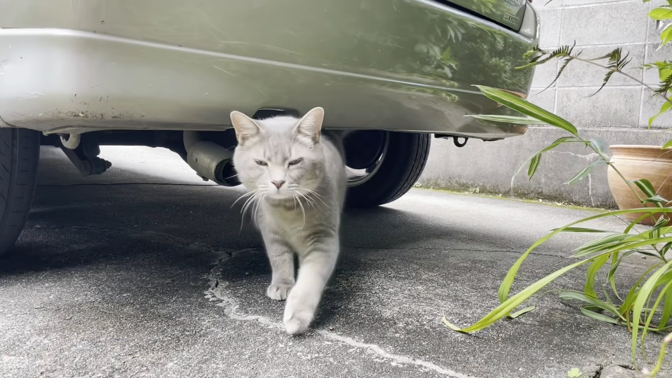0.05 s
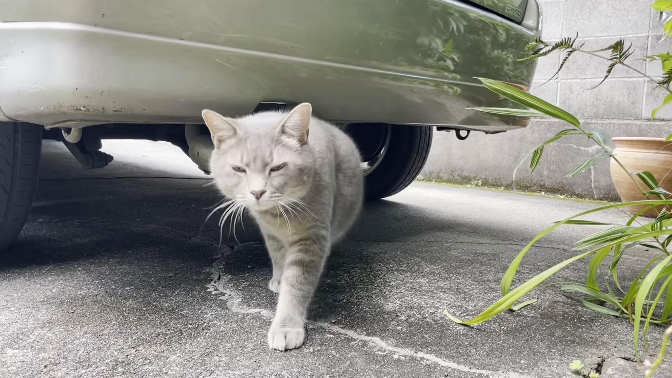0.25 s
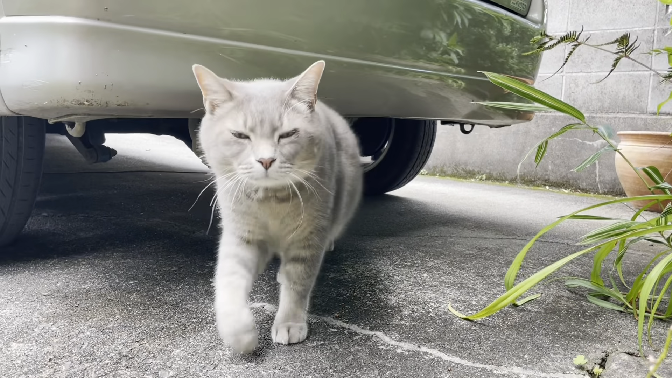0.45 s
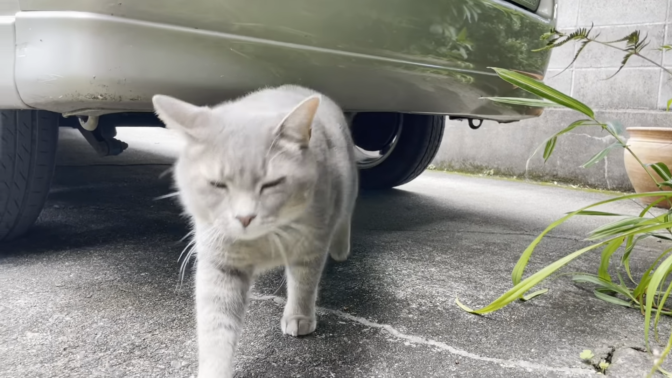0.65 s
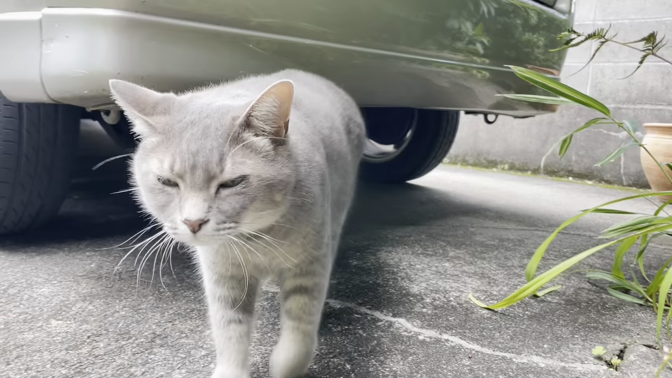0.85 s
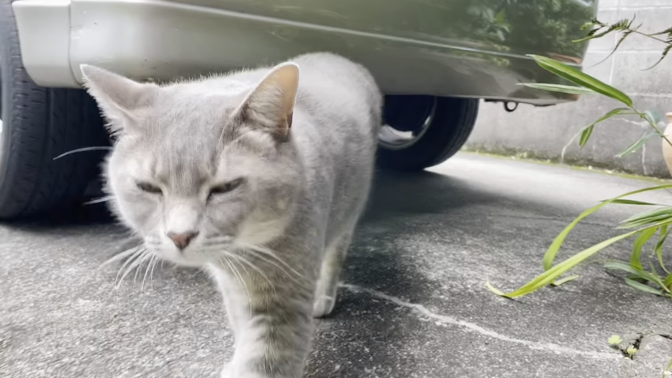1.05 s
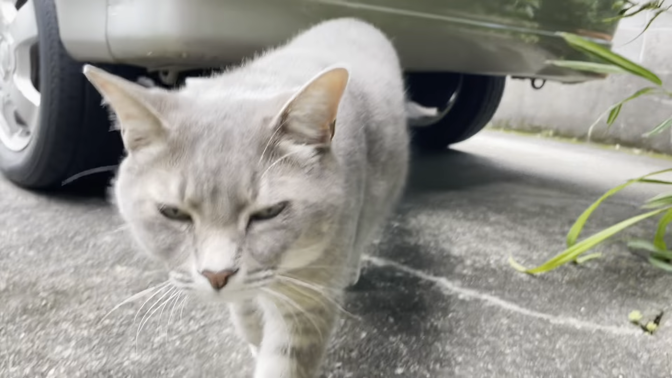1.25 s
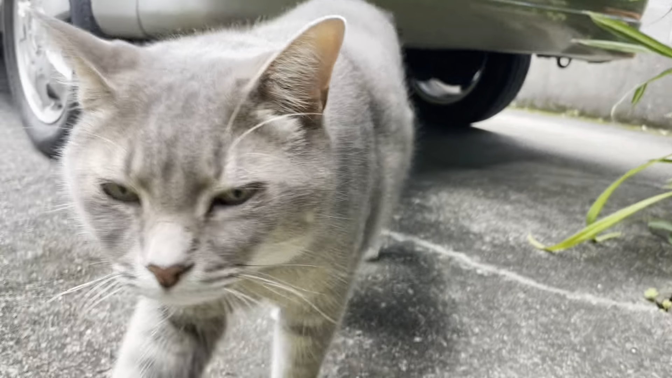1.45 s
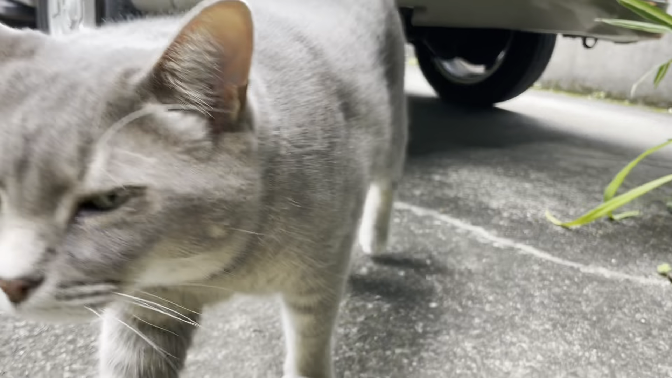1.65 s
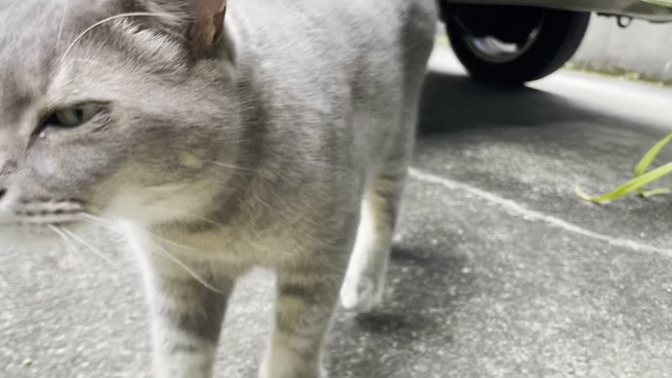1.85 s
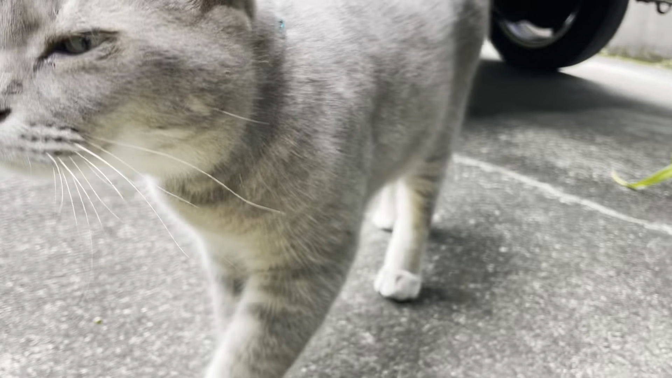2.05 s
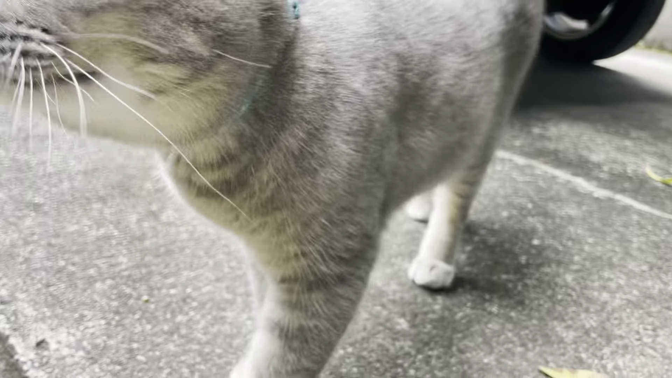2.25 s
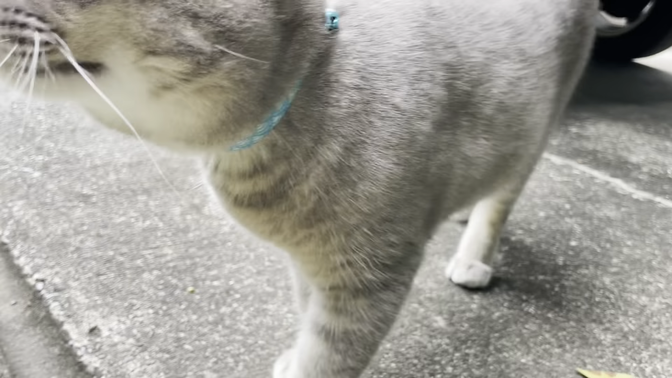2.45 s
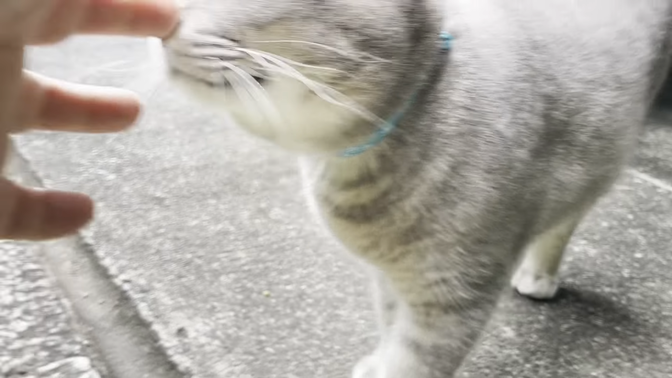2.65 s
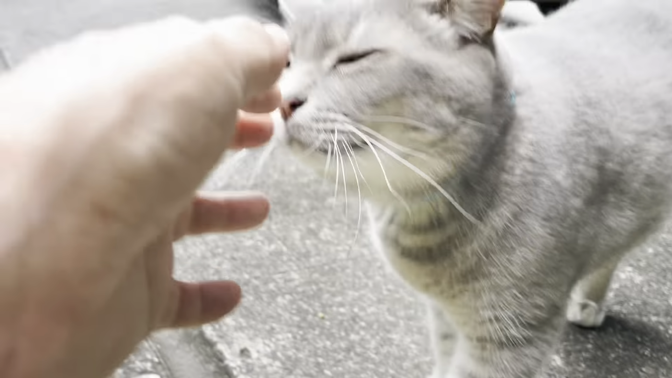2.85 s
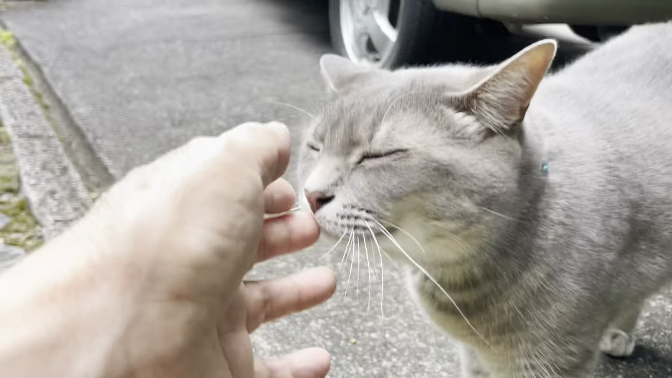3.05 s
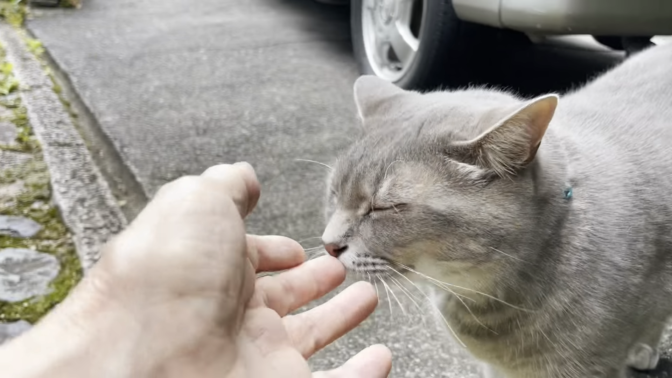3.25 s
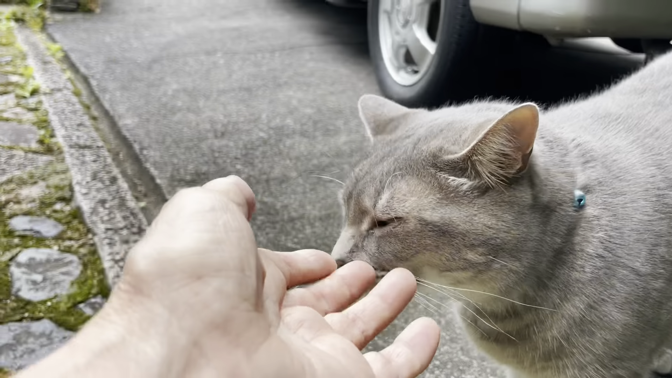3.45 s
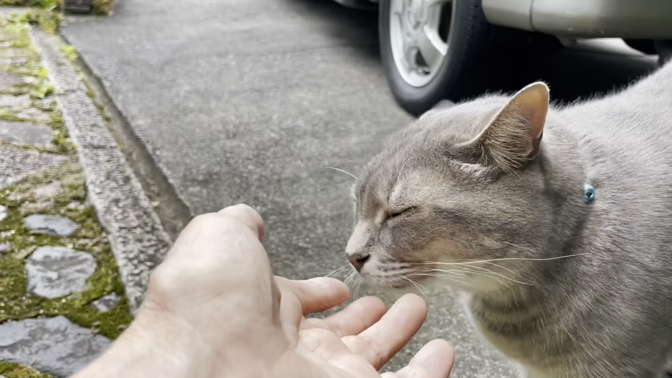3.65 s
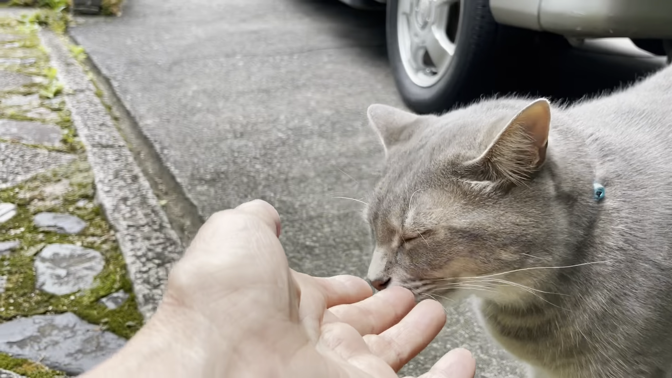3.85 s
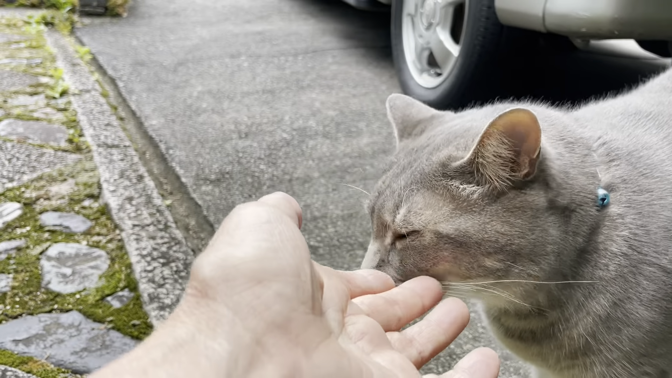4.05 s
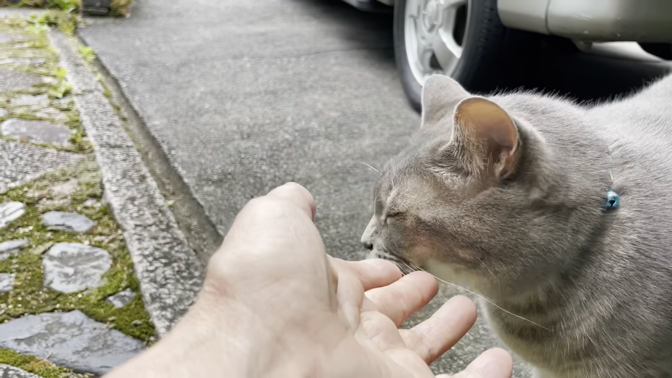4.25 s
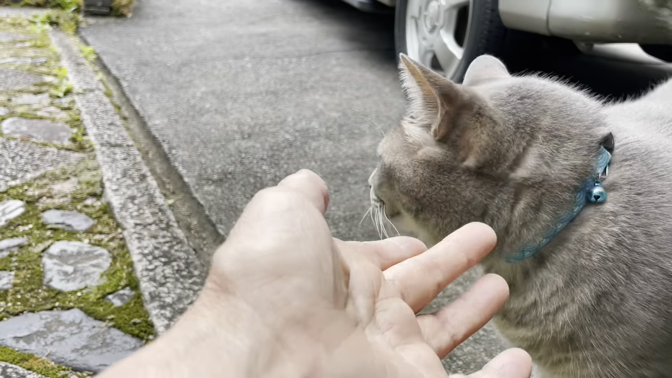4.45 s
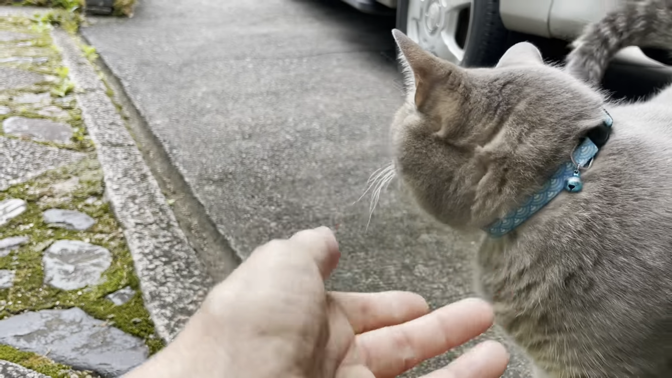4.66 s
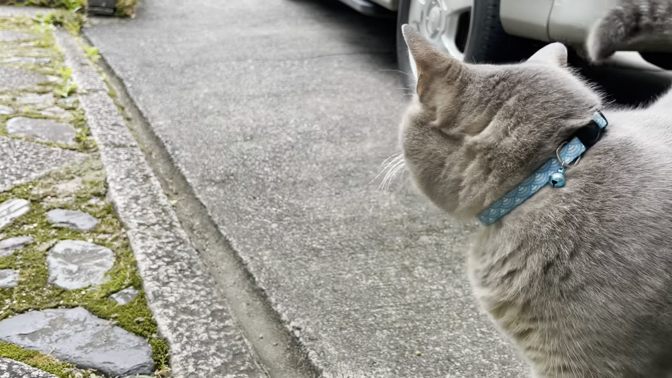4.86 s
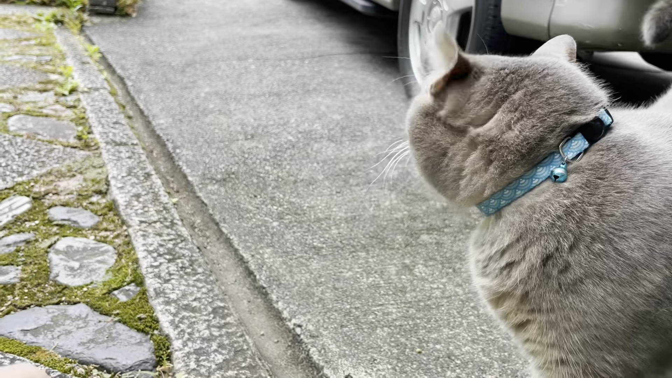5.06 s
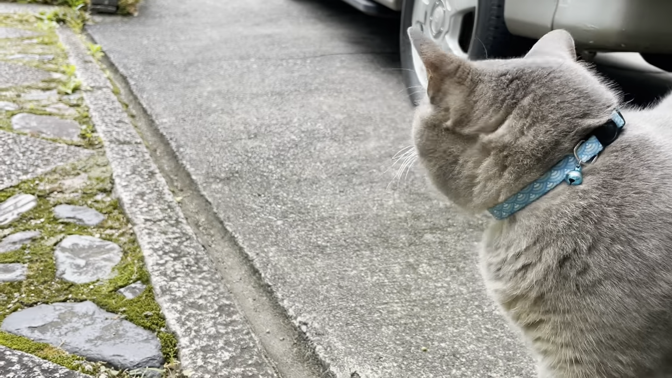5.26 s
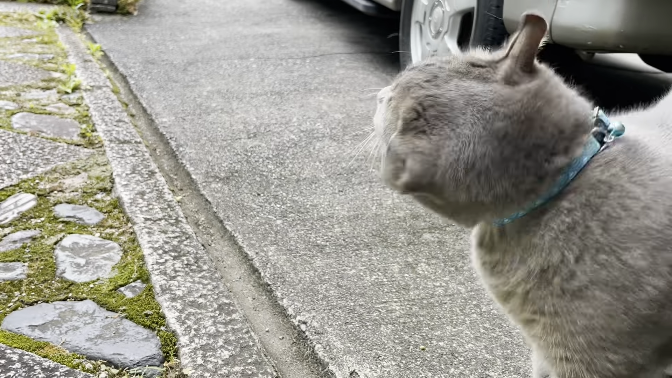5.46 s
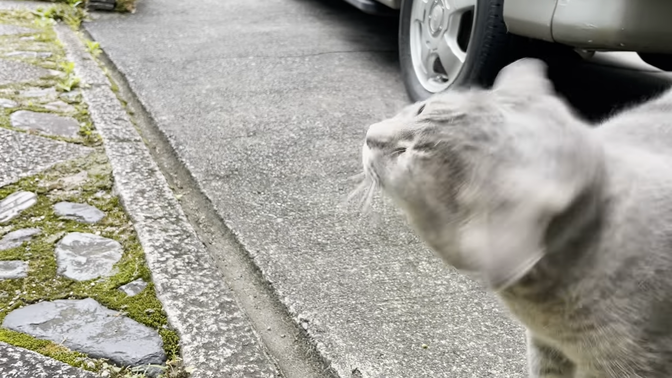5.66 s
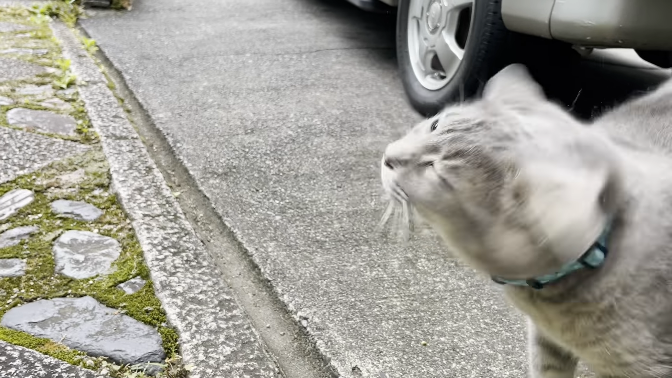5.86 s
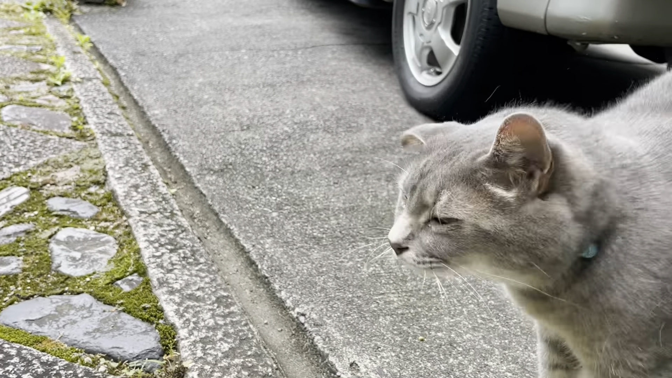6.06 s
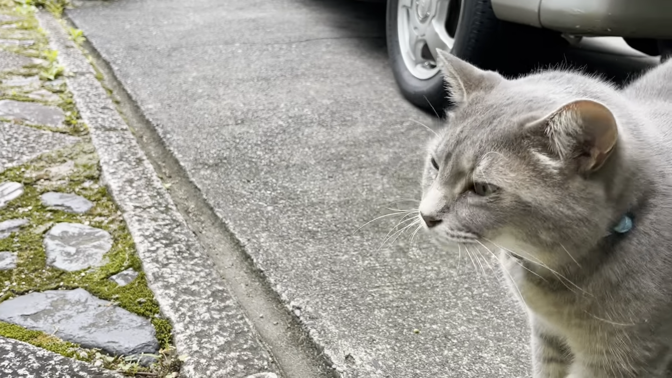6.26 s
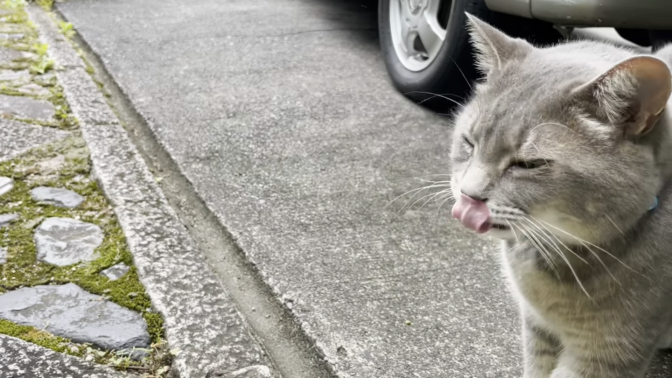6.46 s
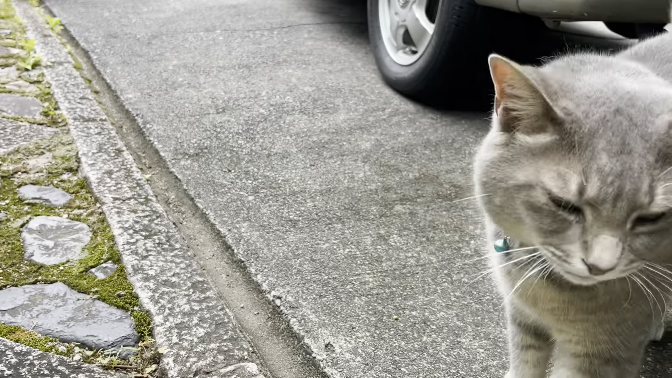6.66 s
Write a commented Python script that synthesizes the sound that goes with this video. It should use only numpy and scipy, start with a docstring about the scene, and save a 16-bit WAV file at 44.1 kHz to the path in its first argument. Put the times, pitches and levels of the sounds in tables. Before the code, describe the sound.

A cat pads quietly over concrete in a yard, its small collar bell barely ticking. Around it are a thin hiss of far cicadas, brief insect rasps and the low rumble of a town, and one closer cicada gradually starts to sing. After about five seconds comes the loudest sound, a close head shake: a quick, high rattle of the bell mixed with flapping ears and a soft puff of air. The insects carry on.

```python
"""A town rumbles and far cicadas hiss throughout. From the start an insect rasps now and then and a low,
distant cicada comes and goes; a pellet taps faintly in the tiny bell on a cat's collar and paws scuff
the concrete. From 2.35 s a near cicada winds up its song, muscle pulses buckling the ribs of its drums.
At 5.4 s the cat shakes its head: ears slap, the pellet rattles the bell, fur flutters and air puffs.
The yard scatters a short echo, and two microphone ports shift the treble's phase."""
import sys
import numpy as np
from scipy import signal
from scipy.fft import rfft, irfft, next_fast_len
from scipy.io import wavfile
from scipy.ndimage import uniform_filter1d

SR = 44100
rng = np.random.default_rng(int(sys.argv[2]) if len(sys.argv) > 2 else 0)


def wrap_up_sound(samples):
    """Save the sound to the file named by the first command line argument, as 16-bit audio."""
    columns = np.atleast_2d(samples).T
    # keep every value between -1 and 1, then stretch to whole-number steps
    tamed = np.clip(columns, -1, 1)
    steps = np.round(tamed * 32767).astype(np.int16)
    wavfile.write(sys.argv[1], SR, steps)


N = 296352


def gain_of(db):
    """Amplitude ratio of a level in decibels."""
    return 10 ** (np.asarray(db) / 20)


def unit_rms(x):
    """Normalisation to rms 1."""
    return x / np.sqrt(np.mean(x ** 2) + 1e-20)


def slow_noise(count, size, passes=1):
    """Low-pass noise of rms 1: white noise under moving averages of size samples."""
    x = rng.standard_normal(count)
    for _ in range(passes):
        x = uniform_filter1d(x, size=size)
    return unit_rms(x)


def pan(left_db):
    """Level difference: two gains, the left one left_db above the right."""
    return gain_of(left_db * np.array([[.5], [-.5]]))


def read(points, hz):
    """Interpolation of a spectrum table on a logarithmic frequency axis."""
    f, value = np.transpose(points)
    return np.interp(np.log(hz + 1), np.log(f + 1), value)


def add(mix, start_s, sound):
    """Superposition of a sound on the mix."""
    part = mix[round(start_s * SR):][:len(sound)]
    part += sound[:len(part)]


def coloured(x, points, tilt_db=0):
    """Minimum-phase filtering by a spectrum table, tilted by about tilt_db per octave."""
    hz = abs(np.fft.fftfreq(2048, 1 / SR))
    log_gain = np.log(gain_of(read(points, hz) + tilt_db * np.log2((hz + 200) / 2000)))
    response = np.fft.ifft(np.exp(np.conj(signal.hilbert(log_gain)))).real[:1024]
    return signal.oaconvolve(x, response)[:len(x)]


# Likeness of the background's two channels: f/Hz, coherence
COHERENCE = [(60, 0.99), (200, 0.91), (600, 0.25), (1500, 0.03), (3000, 0.69), (5000, 0.25), (7000, 1),
             (8200, 1), (12000, 0.99)]
# Balance of the background: f/Hz, left-minus-right level/dB
BALANCE = [(60, 0), (180, 2), (550, 1), (1650, 0.5), (4970, 2), (15000, -1.5)]
def wide_noise(field_db, size, patchy_db):
    """Partially coherent stereo noise of rms 1, shaped by field_db(hz, t) and by random patches."""
    hz = np.fft.rfftfreq(size, 1 / SR)
    t = np.arange(4 * N // size + 5) * size / 4 / SR
    a, b, c, d, patches = rng.standard_normal((len(t), len(hz), 5)).T
    patches = unit_rms(uniform_filter1d(uniform_filter1d(patches, size=8, axis=0), size=16, axis=1))
    coherence = read(COHERENCE, hz)[:, None]
    left = a + 1j * b
    right = coherence * left + np.sqrt(1 - coherence ** 2) * (c + 1j * d)
    spectra = np.array([left, right]) * pan(read(BALANCE, hz))[:, :, None]
    spectra *= gain_of(field_db(hz[:, None], t) + patchy_db * patches)
    return unit_rms(signal.istft(spectra, nperseg=size, noverlap=size * 3 // 4)[1][:, :N])


# Spectral density of the town: f/Hz, relative level/dB
TOWN_SPECTRUM = [(12, -47), (20, -28), (36, -25.5), (53, 7.5), (69, 3.5), (87, -6.5), (118, 1),
                 (143, -11.5), (210, -2), (265, -12.5), (295, -19), (381, -26.5), (572, -35), (1400, -41.5),
                 (3300, -49), (4290, -63), (7260, -120)]
# Swells of the bass, the peak at 5.8 s being air pushed by the cat's head shake:
# t/s, level/dB, hump near 215 Hz/dB
BASS_SWELLS = [(0, -54.5, 2.5), (.54, -51, -9.5), (1.15, -50.5, -2.5), (1.5, -54, -3), (3.3, -51.5, -10),
               (3.7, -51.5, -1), (4, -50, 1.5), (4.7, -51.5, -5.5), (5.45, -51, -12), (5.8, -41.5, -14.5),
               (6.3, -53, -3.5), (6.72, -47.5, -12.5)]
def rumble():
    """Low-frequency noise: the rumble of the town, with a puff of air as the cat shakes its head."""
    times, level_db, hump_db = np.transpose(BASS_SWELLS)
    def field(hz, t):
        swell = (np.interp(t, times, level_db) - level_db.mean()) / (1 + (hz / 450) ** 4)
        hump = (np.interp(t, times, hump_db) - hump_db.mean()) * np.exp(-((hz - 215) / 80) ** 2)
        return read(TOWN_SPECTRUM, hz) + swell + hump
    return gain_of(level_db.mean()) * wide_noise(field, size=2048, patchy_db=1.48)


# Spectral density of the chorus: f/Hz, relative level/dB
CHORUS_SPECTRUM = [(2800, -109), (3300, -24), (4200, -12.5), (5200, -4.5), (6300, 1.5), (7500, 6),
                   (8500, 9.5), (10000, -5.5), (12000, -13.5), (13400, -10.5), (14300, -60)]
def chorus():
    """Incoherent sum of many far cicadas: a hiss that throbs slightly at 16 Hz."""
    def field(hz, t):
        return read(CHORUS_SPECTRUM, hz) + np.sin(2 * np.pi * 16 * t)
    return gain_of(-53) * wide_noise(field, size=512, patchy_db=2)


# Scrapes of the insect: t/s, level before filtering/dB, duration/s
RASP_STROKES = [(0.083, -45, 0.079), (0.476, -45.5, 0.024), (0.686, -44.5, 0.058), (0.856, -50.5, 0.17),
                (1.11, -42, 0.068), (1.584, -51.5, 0.081), (1.6656, -40.5, 0.045), (2.073, -51, 0.067),
                (2.217, -36.5, 0.013), (2.73, -40.5, 0.054), (3.112, -42, 0.047), (3.52, -38, 0.028),
                (3.698, -49, 0.025), (3.914, -39, 0.025), (4.049, -50, 0.037), (4.316, -39.5, 0.059),
                (4.515, -48, 0.028), (4.91, -40.5, 0.031), (5.344, -40.5, 0.042), (5.76, -36, 0.018),
                (6.136, -37.5, 0.029), (6.478, -37, 0.029)]
# Resonance of a scrape: f/Hz, gain/dB
RASP_SPECTRUM = [(4500, -43.5), (5600, 0), (6600, 9), (7600, -3), (9000, -1), (11000, -3), (13500, -13.5),
                 (14500, -62)]
def rasps():
    """Stridulation: teeth scrape past at 205 a second, and the yard's echo decays behind them."""
    out, t = np.zeros(N), np.arange(SR // 4) / SR
    teeth = 0.45 + np.exp(-(t * 205 % 1) / 0.044)
    rise = np.clip(t / 0.0099, 0, 1)
    echo = 0.46 * gain_of(-60 * t / 0.21)
    for start, db, length in RASP_STROKES:
        stroke = 1 / (1 + np.exp((t - length) / 0.015))
        add(out, start, gain_of(db) * rng.standard_normal(len(t)) * rise * (teeth * stroke + echo))
    return coloured(out, RASP_SPECTRUM)


# Calls of the lower, farther cicada: t/s, duration/s, level/dB, centre f/Hz
FAR_CALLS = [(0.123, 0.56, -74, 3760), (0.503, 0.93, -67.5, 3850), (1.33, 0.31, -77, 4520),
             (3.854, 1.16, -68, 3866)]
def far_cicada():
    """Narrow-band noise with a shallow amplitude modulation at 67 pulses a second."""
    out = np.zeros(N)
    for start, length, db, hz in FAR_CALLS:
        t = np.arange(0, length, 1 / SR)
        blur = signal.lfilter(*signal.butter(2, 173, fs=SR), rng.standard_normal((2, len(t))))
        band = ((blur[0] + 1j * blur[1]) * np.exp(2j * np.pi * hz * t)).real
        pulses = 1 + 0.059 * np.cos(2 * np.pi * 67 * t)
        add(out, start, gain_of(db) * unit_rms(band * pulses) * signal.windows.tukey(len(t), 0.89))
    return out


# Modes of the bell's shell: f/Hz, relative level/dB, share of the blow's T60
BELL_MODES = [(12145, 0, 1), (11850, -22, .7), (12400, -17, .7), (12960, 0, 1)]
def shell_ring(t, upper_db, t60, free_s):
    """Free vibration: struck modes decay until the pellet or the fur damps them after free_s."""
    hz, mode_db, t60_share = np.transpose(BELL_MODES)[:, :, None]
    detune, phase = rng.standard_normal((2, len(BELL_MODES), 1))
    mode_db = mode_db + np.array([[0], [0], [0], [upper_db]])
    decay = gain_of(mode_db - 60 * t / (t60_share * t60))
    modes = decay * np.sin(2 * np.pi * hz * (1 + 0.0024 * detune) * t + 3 * phase)
    attack = np.clip(t / 0.00041, 0, 1)
    damping = np.clip(1 - (t - free_s) / 0.0034, .03, 1)
    return modes.sum(0) * attack * damping


# Blows of the pellet: t/s, level/dB, relative level of the fourth mode/dB, T60/s, free ringing/s
PELLET_BLOWS = [(0.2458, -54, -18, .08, .015), (0.3052, -56, -9, .08, .015),
                (0.411, -44.5, -23, .08, 0.026), (5.3866, -37.5, -16, .1, 0.0042),
                (5.4255, -52, -15, .06, .01), (5.4365, -36, -9, .04, 0.0092), (5.4545, -35, -8, .1, 0.0035),
                (5.458, -29.5, -8, 0.069, .014), (5.472, -40, -10, .3, .011), (5.4824, -39, -12, .1, .013),
                (5.4974, -19, -25, 0.092, .008), (5.5054, -27, -10, 0.035, .012),
                (5.522, -42, -15, .2, .012), (5.5354, -36, -17, .2, .006), (5.5412, -28.5, -15, .3, .003),
                (5.544, -28, -19, 0.045, .012), (5.5574, -35, -12, 0.058, 0.016),
                (5.5827, -30, -12, 0.027, .004), (5.587, -40, -14, .1, .008), (5.604, -42, -12, .03, .005),
                (5.6256, -26.5, -15, 0.058, 0.0055), (5.6332, -22.5, -11, 0.018, 0.0046),
                (5.663, -36, -2, .08, .011), (5.6755, -37, -6, .05, .005), (5.6814, -37, -8, .1, 0.017),
                (5.703, -45, -10, .1, 0.016), (5.7239, -44.5, 2, .05, 0.0098),
                (5.7743, -12.5, -16, 0.049, 0.0096), (5.7844, -18.5, -20, 0.049, .015),
                (5.8014, -29, -14, 0.061, .018), (5.8215, -36, -12, .06, 0.0095),
                (5.8502, -20, -7, 0.032, .004), (5.854, -33, -3, .05, .009), (5.864, -36, -2, .3, 0.006),
                (5.8775, -16, -11, 0.055, 0.04), (5.912, -24, -20, 0.22, 0.0083),
                (5.9209, -20, -18, .07, .009), (5.931, -30, -7, .2, 0.0046), (5.9645, -40, -8, .02, .004),
                (5.9774, -34, -6, .2, .004), (5.982, -28, -10, .1, 0.003), (5.9884, -7.5, -22, 0.016, .005),
                (5.9945, -19, -20, 0.063, 0.014), (6.0105, -23, -13, 0.062, 0.02),
                (6.048, -51, -12, .2, .008), (6.114, -47, -2, .2, .007), (6.1214, -36, -7, .2, .006),
                (6.127, -33, -8, .04, .007), (6.1515, -40, -10, .05, .005),
                (6.166, -37.5, -16, 0.037, .007), (6.2235, -55, -12, .1, .006),
                (6.231, -51, -12, .1, 0.0089), (6.2527, -31, -15, .04, 0.0099),
                (6.262, -38, -16, 0.33, .009), (6.2713, -28, -10, 0.099, 0.021), (6.3, -55, -8, .2, .012),
                (6.319, -53, 2, .1, .012), (6.342, -51, -10, .04, 0.0077), (6.381, -38.5, -27, 0.12, .022),
                (6.4315, -40, -12, .08, .008), (6.4808, -49, -14, 0.035, .006),
                (6.4957, -54, -14, .05, .006), (6.558, -50, -9, .03, .004), (6.6574, -57, -12, .04, .003)]
# Colour of the contact tick: f/Hz, gain/dB
TICK_SPECTRUM = [(2000, -58), (5000, -22.5), (8000, -1), (10000, -4), (13200, 2), (14300, -34),
                 (16500, -106)]
def bell():
    """Impact excitation: each blow ticks and rings the shell; the tick's share peaks at a firm blow."""
    rings, ticks, t = np.zeros(N), np.zeros(N), np.arange(SR // 5) / SR
    firm_db, tick_t60 = -27.5, .011
    for start, db, upper_db, t60, free_s in PELLET_BLOWS:
        add(rings, start, gain_of(db) * shell_ring(t, upper_db, t60, free_s))
        tick_db = db + 3 - 0.21 * max(db - firm_db, 0) - 0.34 * max(firm_db - db, 0)
        add(ticks, start, gain_of(tick_db - 60 * t / tick_t60) * rng.standard_normal(len(t)))
    return rings + coloured(ticks, TICK_SPECTRUM)


# Brushes of paws and fur: t/s, level before filtering/dB, T60/s, tilt/(dB per octave)
SCUFF_STROKES = [(0.39, -62, 0.14, -16.5), (1.24, -59, 0.21, 3), (1.33, -55.5, 0.38, 2.5),
                 (1.631, -61.5, 0.84, 5), (1.808, -53.5, 0.75, 3), (1.875, -64, .3, 6),
                 (2.029, -58, 1, 8.5), (2.088, -48, 0.13, 4), (3.658, -56, 0.11, -11),
                 (5.41, -49.5, 0.59, 11), (5.505, -52, 0.62, 11.5), (5.58, -43, 0.32, 7),
                 (5.65, -42, 0.34, 8), (5.74, -40.5, 0.49, 4), (5.843, -52, 0.15, -15.5),
                 (5.935, -40.5, 0.33, 4), (6.084, -50.5, 0.37, -1), (6.34, -48.5, 0.16, -5.5),
                 (6.555, -57, 0.68, -7.5), (6.665, -56.5, 0.37, -11.5)]
# Colour of a brush: f/Hz, gain/dB
SCUFF_SPECTRUM = [(250, -12), (600, -5.5), (1300, -7.5), (2500, -7), (3500, -9.5), (5000, -15), (9000, -13),
                  (14000, -62)]
def scuffs():
    """Friction noise: paws and fur brush in soft, grainy bursts that decay exponentially."""
    out, t = np.zeros(N), np.arange(SR // 3) / SR
    rise = np.clip(t / 0.025, 0, 1)
    for start, db, t60, tilt_db in SCUFF_STROKES:
        grit = rng.standard_normal(len(t)) * gain_of(2.5 * slow_noise(len(t), size=200))
        add(out, start, gain_of(db - 60 * t / t60) * rise * coloured(grit, SCUFF_SPECTRUM, tilt_db))
    return out


# Wind-up of the near cicada: t/s, muscle pulse rate/Hz, drum f/Hz, roughness
WIND_UP = [(2.35, 55.8, 4100, 1.2), (2.6, 57.05, 4180, 1), (2.83, 60, 4300, .8), (2.98, 60.3, 4390, .7),
           (3.12, 63.2, 4450, .5), (3.3, 64.1, 4480, .35), (3.56, 66.5, 4535, .3), (3.85, 70.4, 4650, .3),
           (4.04, 72.9, 4725, .3), (4.25, 74, 4880, .3), (4.52, 75.5, 4910, .24), (5, 78.5, 4935, .12),
           (5.48, 81.3, 4978, .1), (5.96, 83.35, 5032, .1), (6.72, 85, 5050, .1)]
# Bands of its drums, the song sinking from the high ones to the low: frequency ratio, level/dB,
# end of rise t/s, start of fall t/s, rise/(dB/s), fall/(dB/s), share of the sweep
DRUM_BANDS = [(1.45, -58, 2.6, 2.92, 34, 58, 1.3), (1.2, -61, 3.03, 3.44, 45, 39, 1.2),
              (1.31, -58.5, 2.46, 3.3, 21, 55, 1.3), (1.17, -66.5, 4.85, 5.4, 40, -3, 0.42),
              (1.102, -55.5, 3.34, 3.78, 24, 26, 0.74), (0.999, -51.5, 4.72, 7, 12.5, 6, 1.4),
              (1.01, -62, 3.18, 3.6, 44, 30, 1.3), (.962, -57.5, 3.82, 4.14, 28, 19, 0.37),
              (0.841, -61, 4.86, 4.6, 32, -2.5, 0.58)]
def cicada():
    """Amplitude and phase modulation: each muscle pulse buckles ribs, so every band swells and sweeps."""
    times, *columns = np.transpose(WIND_UP)
    start = times[0]
    t = np.arange(start, times[-1], 1 / SR)
    pulse_hz, drum_hz, roughness = (np.interp(t, times, column) for column in columns)
    unsettled = np.exp((start - t) / 0.64)
    sweep_rad, throb_depth = 0.78 + 3.1 * unsettled, .55 + .6 * unsettled
    pulse_count = np.cumsum(pulse_hz) / SR
    out, song = np.zeros(N), np.zeros(len(t))
    for k, (ratio, db, full_s, until_s, rise, fall, share) in enumerate(DRUM_BANDS):
        jitter_rad = 1.74 * roughness * slow_noise(len(t), size=110, passes=2)
        waver_db = 1.1 * slow_noise(len(t), size=1500, passes=2)
        wander_hz = 16 * roughness * slow_noise(len(t), size=1500, passes=2)
        slip = 2.2 * slow_noise(len(t), size=5000, passes=2)  # the two drums slip out of step
        pulse = 2 * np.pi * (pulse_count + 0.349 * k)
        throb = unit_rms(1 + throb_depth * np.cos(pulse) + 0.31 * np.cos(2 * pulse + slip))
        carrier = 2 * np.pi * np.cumsum(ratio * drum_hz + wander_hz) / SR
        tone = np.cos(carrier + share * sweep_rad * np.cos(pulse + 0.46 * slip) + jitter_rad)
        fade_db = rise * np.maximum(full_s - t, 0) + fall * np.maximum(t - until_s, 0)
        song += gain_of(db + waver_db - fade_db) * throb * tone
    add(out, start, song * np.clip((t - start) / 0.44, 0, 1))
    return out * pan(left_db=5.5)


# Slaps of ears and collar: t/s, level before filtering/dB, boosted band/(octaves above 1 kHz)
EAR_SLAPS = [(5.413, -60, 0.73), (5.419, -57, .5), (5.435, -54, 0.9), (5.441, -48, -0.2),
             (5.454, -39, 0.91), (5.493, -52, -.3), (5.508, -46, 1.5), (5.518, -38, 1.3),
             (5.583, -35.5, 0.75), (5.61, -43.5, 1.1), (5.632, -52, 1.5), (5.646, -48, 1.6),
             (5.676, -34, 1.03), (5.744, -45, 0.073), (5.7727, -32, 2.2), (5.845, -34.5, .2),
             (5.868, -43, 0.84), (5.877, -28, 1.3), (5.946, -46.5, 0.82), (5.964, -46, 0.65),
             (5.975, -40, 1), (5.988, -33, 1.4), (6.086, -53.5, 1.2), (6.107, -55, 1.3)]
# Colour of a slap: f/Hz, gain/dB
SLAP_SPECTRUM = [(200, -13), (700, 0.5), (1500, 1.5), (3000, -1.5), (7000, 4), (12000, 9), (13600, -1),
                 (14600, -20), (16500, -28)]
def flaps():
    """Impact transients: each slap is an impulse with a short noisy tail, boosted in its own band."""
    out, t = np.zeros(N), np.arange(2000) / SR
    hz = np.geomspace(200, 16500, num=40)
    decay = gain_of(-60 * t / 0.0071) + 0.067 * gain_of(-60 * t / 0.13)
    for start, db, octave in EAR_SLAPS:
        slap = (rng.standard_normal(len(t)) + 4 * (t == 0)) * decay
        boost_db = 6.5 * np.exp(-((np.log2(hz / 1000) - octave) / 0.92) ** 2)
        spectrum = np.transpose([hz, read(SLAP_SPECTRUM, hz) + boost_db])
        add(out, start, gain_of(db) * coloured(slap, spectrum))
    return out


# Thin pings of the bell: centre t/s, level/dB, half duration/s
TOP_MODE_PINGS = [(5.43, -64, .02), (5.458, -57, .006), (5.486, -47, .007), (5.54, -63, .025),
                  (5.584, -40, .003), (5.603, -62, .005), (5.774, -43, .003), (5.876, -50, .006),
                  (5.989, -49, .003)]
def pings(mode_hz=15940):
    """Tone bursts of the bell's top mode, its line broadened by random amplitude modulation."""
    out = np.zeros(N)
    for centre, db, half in TOP_MODE_PINGS:
        t = np.arange(0, 2 * half, 1 / SR)
        envelope = np.hanning(len(t)) * (1 + .5 * slow_noise(len(t), size=40))
        add(out, centre - half, gain_of(db) * envelope * np.sin(2 * np.pi * mode_hz * t))
    return out


# Colour of fluttering fur: f/Hz, relative level/dB
FUR_SPECTRUM = [(120, -38), (300, -11), (600, -13.5), (1200, -18.5), (3000, -30), (8000, -46)]
def fur(fastest_s=5.78, width_s=0.14):
    """Randomly modulated noise: fur and skin flutter, most in mid-shake when the head turns fastest."""
    whirl = np.exp(-.5 * ((np.arange(N) / SR - fastest_s) / width_s) ** 2)
    lumps = gain_of(5.9 * slow_noise(N, size=250))
    flutter = coloured(rng.standard_normal(N), FUR_SPECTRUM) * lumps
    return gain_of(-59) * unit_rms(flutter) * whirl


def yard_echo(x, t60=0.16):
    """Scattering: concrete and a car's side return a different short echo to each port."""
    t = np.arange(2500) / SR
    taps = rng.standard_normal((2, len(t))) * gain_of(-60 * t / t60) * (t > .001)
    return signal.oaconvolve(x[None], taps / np.linalg.norm(taps[0]), axes=1)[:, :N]


def scene():
    """Superposition of direct and scattered sound; rustles near the ground scatter more than the bell."""
    jingle = bell() + pings()
    rustle = flaps() + scuffs() + fur()
    insects = rasps() + far_cicada()
    echo = yard_echo(gain_of(-21) * jingle + gain_of(-12) * rustle + gain_of(-9) * insects)
    cat = (jingle + rustle) * pan(left_db=0.1)
    return cat + insects + echo + cicada() + chorus() + rumble()


# Phase difference of the microphone ports: f/Hz, lead of the left port/rad
PORT_LEAD = [(4000, 0.1), (5100, .9), (5860, -.1), (6900, -1.4), (8180, -3.14), (9300, -4.3), (11370, -6.3),
             (12750, -7.3), (14800, -9.4), (17000, -11)]
def record(dry):
    """All-pass filtering: two ports turn the treble's phase opposite ways; a low-pass limits the band."""
    size = next_fast_len(N + 4096)
    turn = read(PORT_LEAD, np.fft.rfftfreq(size, 1 / SR)) / 2
    ported = irfft(rfft(dry, size) * np.exp(1j * np.array([turn, -turn])), size)[:, :N]
    low_pass = signal.firwin(511, cutoff=16800, window=("kaiser", 9), fs=SR)
    return signal.oaconvolve(ported, low_pass[None], "same")


dry = scene()
out = record(dry)
wrap_up_sound(out)
```